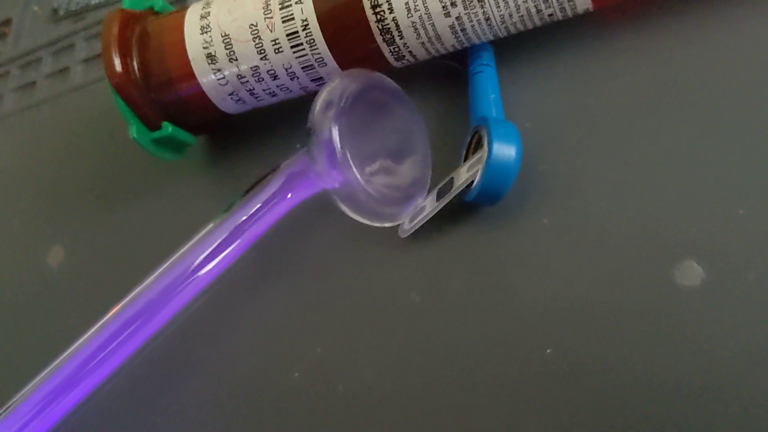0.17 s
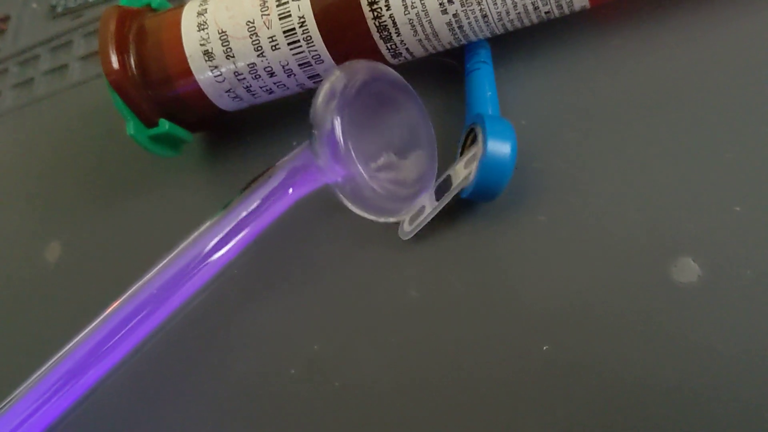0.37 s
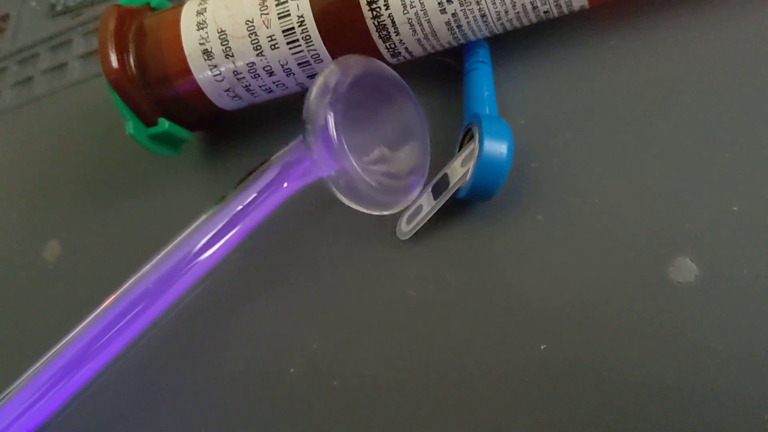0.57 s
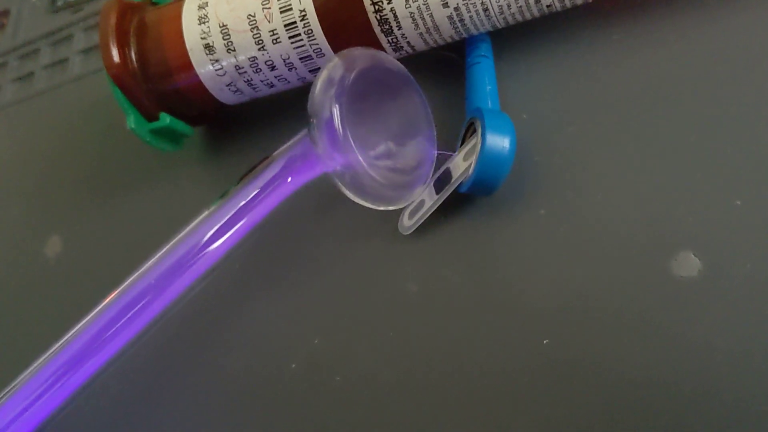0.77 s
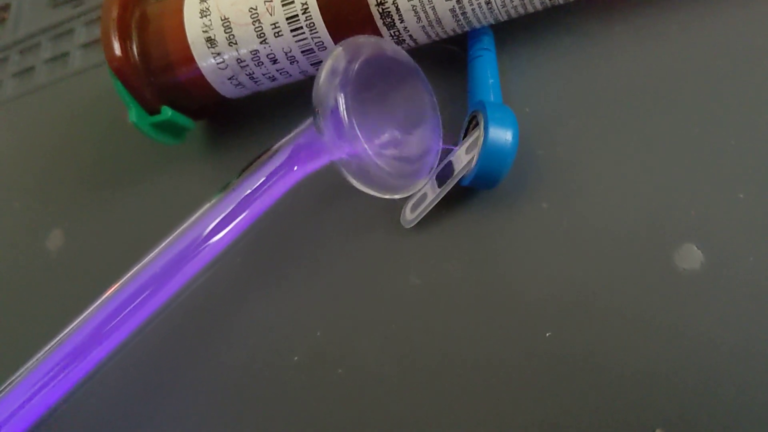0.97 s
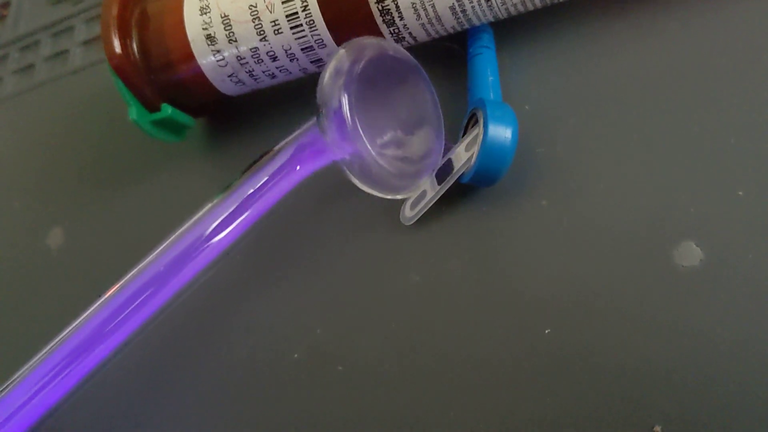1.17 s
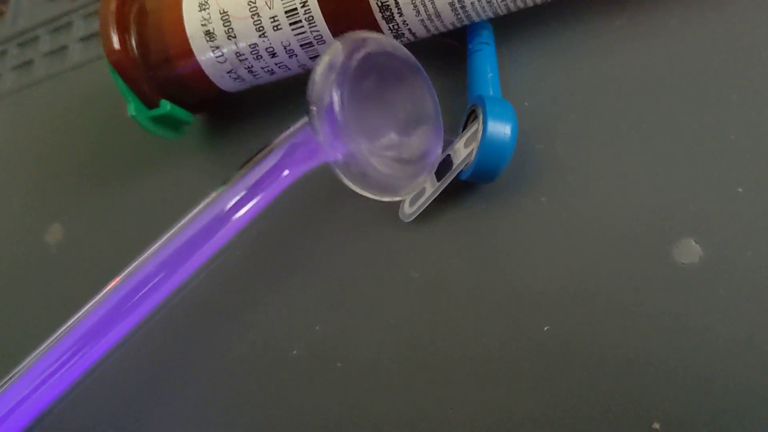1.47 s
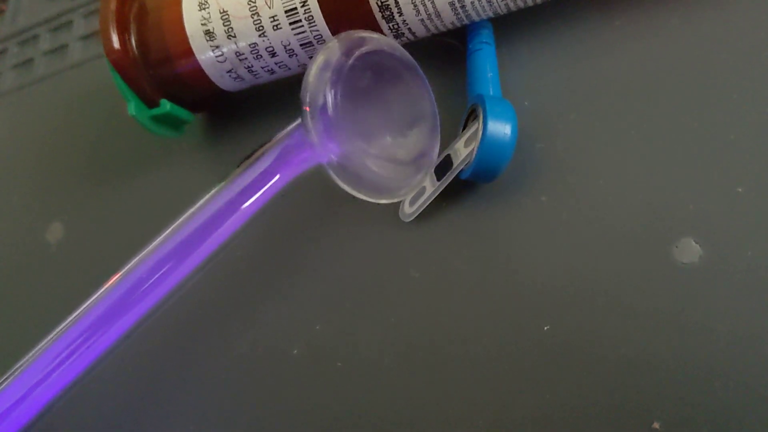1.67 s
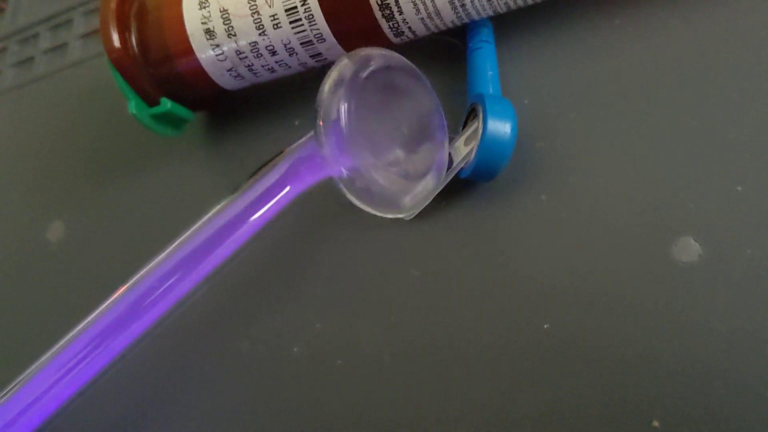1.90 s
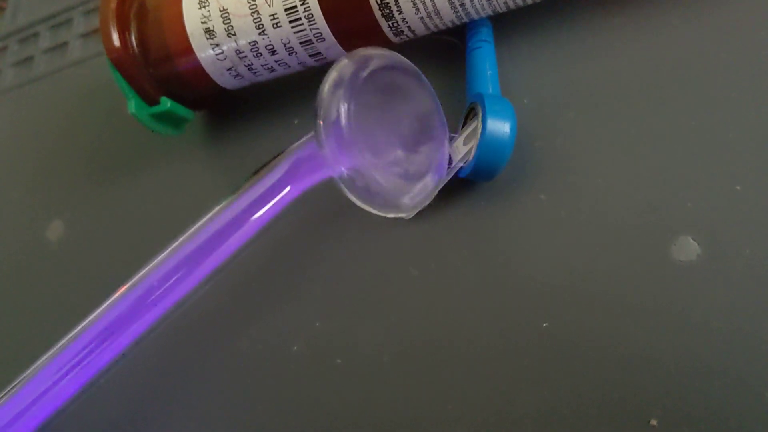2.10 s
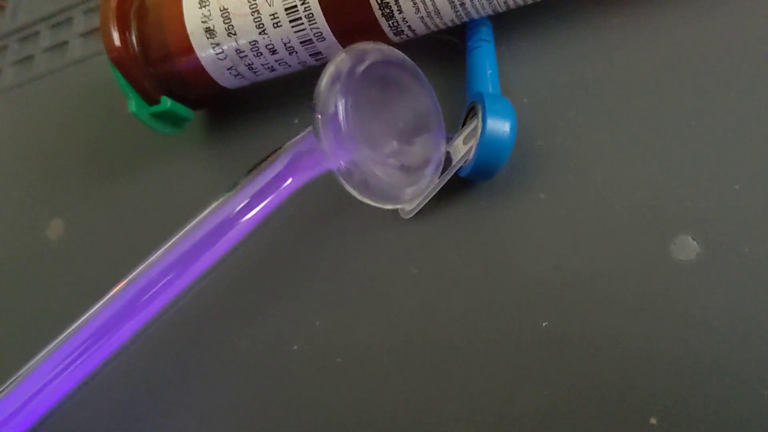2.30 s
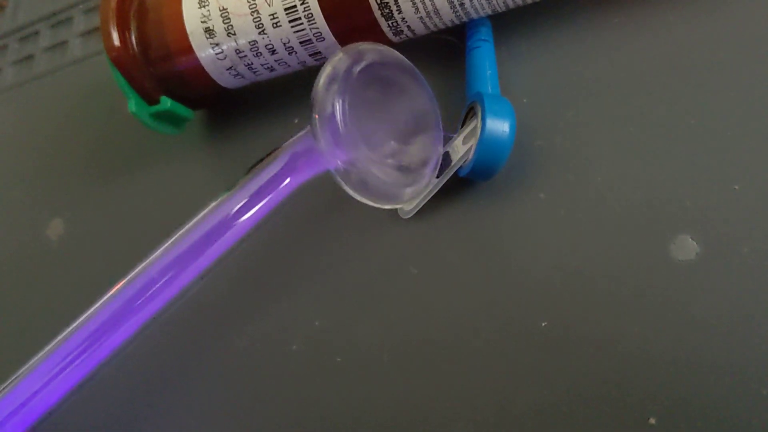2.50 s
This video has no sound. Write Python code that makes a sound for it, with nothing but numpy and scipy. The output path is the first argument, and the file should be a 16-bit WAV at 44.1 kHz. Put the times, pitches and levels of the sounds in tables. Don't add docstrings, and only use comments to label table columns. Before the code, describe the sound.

Electrical discharge buzzes thinly and rapidly, very close to a handheld stereo microphone; soft handling rumble comes first, then snapping sparks with low thumps on the right, a buzzing lull, and a second denser crackle.

```python
import sys
import numpy as np
from scipy import signal
from scipy.fft import rfft, irfft, next_fast_len
from scipy.io import wavfile
from scipy.ndimage import map_coordinates

SR = 44100
rng = np.random.default_rng(int(sys.argv[2]) if len(sys.argv) > 2 else 0)


def elevation(decibels):
    levels = np.asarray(decibels, float)
    return 10 ** (levels / 20)


def wav_out(sig):
    wavfile.write(sys.argv[1], SR, np.round(np.clip(np.atleast_2d(sig).T, -1, 1) * 32767).astype(np.int16))


N = 116865

STRIKE_HZ, FIRST_STRIKE_S = 120.012, .00145
JITTER_S, SCATTER_DB = .000002, 1.2
LEFT_LAG_S = 0.00017

# start_s, rumble_db, rustle_above_rumble_db
HANDLING = [(0, -66, 1), (.09, -59, 4), (.2, -56, -2.5), (.39, -65, 3.5), (.43, -46.5, -11.5),
            (.52, -51.5, -6.5), (.56, -59, -2), (.9, -64, 2.5), (1.1, -74.5, 8.5), (1.17, -78, 2),
            (1.66, -82, 15), (1.71, -67.5, 7.5), (1.8, -65, -2), (1.95, -76, 3), (2.3, -94, 0),
            (2.65, -79, -12)]
# frequency_hz, density_db
RUMBLE_SPECTRUM = [(15, -43), (25, -41), (45, 0), (75, -3.5), (282, -14.5), (669, -20), (734, -13.5),
                   (1000, -31), (1300, -26), (2200, -120)]
# start_s, level_db
HUM_LEVEL = [
    (.52, -63),
    (.6, -57),
    (.85, -59),
    (.95, -83),
]
# frequency_hz, density_db
HISS_SPECTRUM = [(25, -17), (60, -15), (300, -7), (1000, -2.5), (2200, -3.5), (3200, 4.5), (4500, 3.5),
                 (10000, 3), (16000, -25)]
# start_s, level_db, polarity
JOLTS = [(.885, -36.5, 1), (.918, -40.5, 1), (.935, -11.5, 1), (1.018, -26.5, 1), (1.043, -12.5, 1),
         (1.052, -21, -1), (1.851, -17.5, 1), (1.860, -20.5, 1), (2.001, -27, 1), (2.060, -25, -1),
         (2.068, -22, 1), (2.176, -21.5, -1), (2.376, -30.5, -1), (2.484, -26, -1), (2.510, -49, 1)]
# frequency_hz, level_db
THUMP_SPECTRUM = [(35, -26), (65, 2.5), (130, -2), (220, 0), (600, -6), (1400, -6.5), (1500, -13),
                  (3500, -9.5), (6000, -52)]
# frequency_hz, t60_s
TABLE_DECAY = [(1000, 0.01), (6000, 0.039), (16000, 0.0059)]
TABLE_LEVEL = [
    [-6],
    [-15],
]
# frequency_hz, t60_s
ROOM_DECAY = [(1000, 0.041), (6000, 0.23), (16000, 0.11)]
ROOM_LEVEL = [
    [-10],
    [-18],
]
# pitch_hz, width_hz, level_db
TUBE_LEFT = [(1450, 160, -17), (3080, 370, -8), (4330, 72, -4), (5200, 300, -46), (2333, 154, -15)]
TUBE_RIGHT = [(1408, 165, -9.5), (3400, 380, -5), (4445, 145, 11.5), (5200, 300, -37), (2332, 50, -5.5)]
# pitch_hz, width_hz, level_db
GLOW_LEFT = [(8250, 1700, -46), (14200, 1600, -6.5), (15200, 600, -46)]
GLOW_RIGHT = [(9840, 380, 11.6), (11230, 550, 5.4), (15200, 1340, 3.5)]
# pitch_hz, width_hz, level_db
STREAMER_LEFT = [(2370, 117, -21), (3800, 2900, -21), (4970, 690, -17.5), (6580, 1850, -12.5),
                 (10260, 170, -5), (10960, 230, -22), (14050, 1100, 0), (14750, 510, -0.5)]
STREAMER_RIGHT = [(2375, 510, -16.5), (4280, 870, -13.5), (5666, 256, -11.5), (6760, 420, -11.5),
                  (9070, 500, -7), (11120, 560, -4), (14770, 1360, -0.5)]
# pitch_hz, width_hz, level_db
SPARK_LEFT = [(2380, 1960, -26), (5674, 330, -12), (6460, 690, -10.5), (10100, 3500, -15.5),
              (11660, 110, -19.5), (13860, 1600, -4.5), (15030, 1600, -1.5)]
SPARK_RIGHT = [(2680, 2000, -20.5), (5040, 910, -10.5), (7360, 1300, -6.5), (9180, 2700, -10),
               (13264, 730, 0), (15200, 4350, -1)]
# start_s, streamer_level_db, streamer_left_minus_right_db, glow_level_db
WAND_COURSE = [(0, -31, -16, -44), (.12, -29.5, -10, -46), (.5, -25.5, -12.5, -37.5),
               (.87, -27.5, -11.5, -33), (.89, -21, -10.5, -63), (1.13, -34, 0, -40), (1.2, -29, -7, -33),
               (1.4, -21.5, -11, -50), (1.6, -24, -14, -69), (1.61, -36.5, -8.5, -33.5),
               (1.82, -38.5, -12, -31.5), (1.83, -26.5, -14, -39), (2.01, -23, -12, -35),
               (2.04, -31, -2, -33), (2.22, -35.5, 1.5, -47), (2.4, -24, -12.5, -31.5),
               (2.49, -24, -11, -33), (2.51, -34.5, -1.5, -36)]
# start_s, change_db
UNEVEN_STRIKES = [(0.068, -2.8), (0.101, -6), (0.11, 5), (0.118, 5), (0.301, -5), (0.385, 4.5),
                  (0.501, 6.5), (0.526, -2), (0.56, 5), (0.76, -1.5), (0.81, 2.5), (0.826, 4.5), (0.86, -1),
                  (0.876, -5), (1.276, -5), (1.285, 3.5), (1.351, -7), (1.368, -6), (1.385, -4),
                  (1.393, 0.5), (1.418, -4), (1.426, 0.5), (1.468, 2.5), (1.476, -5), (1.501, -3),
                  (1.51, -4), (1.518, 2), (1.576, -11), (1.585, -1), (1.601, -0.5), (1.818, -1),
                  (1.843, -3.9), (1.851, 7.5), (1.885, 2.5), (1.893, 4.5), (1.91, 4.5), (1.951, 2.5),
                  (2.001, -1), (2.018, -5), (2.226, -2), (2.293, -4), (2.351, -2.7), (2.501, -2),
                  (2.576, 0), (2.626, 4.5)]
# start_s, left_level_db, right_level_db
FIRST_SPARKS = [(0.885, -16.4, -14.5), (0.893, -21.9, -20.9), (0.901, -19.5, -16.3), (0.91, -18.6, -17.6),
                (0.918, -15.6, -14.2), (0.926, -29.3, -29.6), (0.935, -14.3, -15.0), (0.943, -17.2, -18.9),
                (0.96, -29.4, -25.0), (0.976, -21.5, -24.7), (0.985, -20.9, -23.1), (0.993, -28.5, -29.6),
                (1.043, -12.9, -16.9), (1.051, -16.4, -20.2), (1.06, -26.0, -31.1), (1.068, -21.0, -24.8),
                (1.076, -15.6, -20.1), (1.093, -19.7, -25.4), (1.101, -27.2, -31.8), (1.176, -17.0, -15.6),
                (1.226, -26.7, -21.6), (1.26, -17.0, -13.5), (1.268, -29.4, -22.5)]
SECOND_SPARKS = [(1.785, -27.9, -16.3), (2.026, -18.7, -15.3), (2.035, -12.3, -10.3), (2.043, -16.0, -14.3),
                 (2.06, -12.7, -10.8), (2.068, -16.0, -13.7), (2.101, -17.7, -15.6), (2.11, -15.2, -12.5),
                 (2.118, -17.4, -15.0), (2.126, -25.5, -22.1), (2.135, -16.7, -14.3), (2.151, -18.8, -16.5),
                 (2.16, -20.9, -17.9), (2.168, -16.3, -18.3), (2.176, -11.6, -10.6), (2.185, -17.8, -20.9),
                 (2.21, -20.9, -22.2), (2.276, -26.6, -24.2), (2.51, -15.9, -11.7), (2.518, -17.3, -13.6)]
BAND_LIMIT = [
    [17070],
    [16080],
]


def unit(x):
    return x / np.sqrt(np.mean(x ** 2, axis=-1, keepdims=True) + 1e-20)


def along(points, hz):
    f, value = np.transpose(points)
    return np.interp(np.log(hz + 1), np.log(f + 1), value)


def curve(rows, s):
    t, *columns = np.transpose(rows)
    return [np.interp(s, t, column) for column in columns]


def filtered(x, response):
    m = next_fast_len(N + SR // 2)
    return irfft(rfft(x, m) * response(np.fft.rfftfreq(m, 1 / SR)), m)[..., :N]


def resonances(f, peaks):
    total = 0
    for k, (center, width, db) in enumerate(peaks):
        damping = 1j * f * width
        total = total + (-1) ** k * elevation(db) * damping / (center * center - f * f + damping)
    return total


def voiced(x, left, right):
    def response(f):
        delay = np.exp(-2j * np.pi * f * LEFT_LAG_S)
        both = np.array([resonances(f, left) * delay, resonances(f, right)])
        return both / np.sqrt(np.mean(abs(both) ** 2, axis=1).max())
    return filtered(x, response)


def snapped(s):
    return FIRST_STRIKE_S + np.round((np.asarray(s) - FIRST_STRIKE_S) * STRIKE_HZ) / STRIKE_HZ


def strike_times():
    return FIRST_STRIKE_S + np.arange(int(N / SR * STRIKE_HZ) + 1) / STRIKE_HZ


def uneven_db(count):
    t, db = np.transpose(UNEVEN_STRIKES)
    index = np.round((t - FIRST_STRIKE_S) * STRIKE_HZ).astype(int)
    return np.bincount(index, db, count)


def discharges(s, level_db, pan_db, scatter_db, jitter_s, spread_s, branch_db, count):
    luck = rng.standard_normal((len(s), 2 * count + 2))
    lead_s = s + jitter_s * luck[:, 0]
    lead_db = level_db + scatter_db * luck[:, 1]
    branch_s = lead_s[:, None] + spread_s * abs(luck[:, 2:count + 2])
    when = SR * np.c_[lead_s, branch_s]
    size = elevation(lead_db)[:, None] * np.c_[np.ones(len(s)), elevation(branch_db) * luck[:, count + 2:]]
    at = np.floor(when).astype(int)[..., None] + np.arange(-7, 9)
    off = at - when[..., None]
    click = size[..., None] * np.sinc(off) * np.cos(np.pi * off / 16) ** 2

    def side(db):
        weighted = click * elevation(db)[:, None, None]
        return np.bincount(np.clip(at, 0, N).ravel(), weighted.ravel(), N + 1)[:N]
    return np.array([side(np.minimum(pan_db, 0)), side(np.minimum(-pan_db, 0))])


def noise(spectrum, count):
    white = rng.standard_normal((count, N))
    return unit(filtered(white, lambda f: elevation(along(spectrum, f))))


def recorder_floor():
    t = np.arange(N) / SR
    lumps_db = 1.5 * map_coordinates(rng.standard_normal(40), [t * 14])
    rumble_db, rustle_db = curve(HANDLING, t)
    pair = noise(RUMBLE_SPECTRUM, count=2)
    low = filtered(pair, lambda f: 1 / (1 + (f / 190) ** 4))
    common, difference = (low + elevation(rustle_db) * (pair - low)) * elevation(rumble_db + lumps_db)
    hum = elevation(curve(HUM_LEVEL, t)[0]) * np.sin(2 * np.pi * 103 * t)
    hiss = elevation(-57.5) * noise(HISS_SPECTRUM, count=2)
    return common + hum + np.array([0.24 * difference, -.15 * difference]) + hiss


def wiring_thumps():
    turns, bend, from_hz = 2.4, .4, 470
    cross_hz, cross_width_hz = 140, 45
    jolts = np.zeros(N)
    t, db, sign = np.transpose(JOLTS)
    jolts[np.round(snapped(t) * SR).astype(int)] = np.sign(sign) * elevation(db + 32)

    def response(f):
        phase_turns = turns * np.maximum((100 / (f + 1)) ** bend - (100 / from_hz) ** bend, 0)
        cross = cross_hz ** 2 - f * f + 1j * f * cross_width_hz
        allpass = np.conj(cross) / cross
        return elevation(along(THUMP_SPECTRUM, f)) * np.exp(2j * np.pi * phase_turns) * allpass
    return filtered(jolts, response) * elevation([[-74], [0]])


def reflections(x, decay, level_db, count):
    hz, t, z = signal.stft(rng.standard_normal((count, 2, SR // 8)), SR, nperseg=64)
    tails = signal.istft(z * elevation(-60 * t / along(decay, hz)[:, None]), SR, nperseg=64)[1]
    tails = tails / np.linalg.norm(tails, axis=-1, keepdims=True)
    tails = np.pad(tails, ((0, 0), (0, 0), (30, 0)))
    strike = ((np.arange(N) / SR - FIRST_STRIKE_S) * STRIKE_HZ + 1.1).astype(int)
    spot = rng.integers(count, size=strike[-1] + 1)[strike]
    wet = 0
    for k, tail in enumerate(tails):
        wet = wet + signal.fftconvolve(x * (spot == k), tail, axes=1)[:, :N]
    return elevation(level_db) * wet


def glass_tube():
    s = strike_times()
    clicks = discharges(s, -22 + 0 * s, 0 * s, scatter_db=SCATTER_DB, jitter_s=JITTER_S,
                        spread_s=0.00045, branch_db=-20, count=2)
    return voiced(clicks, TUBE_LEFT, TUBE_RIGHT)


def glow():
    s = strike_times()
    glow_db = curve(WAND_COURSE, s)[2]
    clicks = discharges(s, glow_db + uneven_db(len(s)) + 19, 0 * s, scatter_db=SCATTER_DB,
                        jitter_s=JITTER_S, spread_s=0.000308, branch_db=-20, count=4)
    return voiced(clicks, GLOW_LEFT, GLOW_RIGHT)


def streamers():
    s = strike_times()
    streamer_db, pan_db, _ = curve(WAND_COURSE, s)
    clicks = discharges(s, streamer_db + uneven_db(len(s)) + 20.5, pan_db, scatter_db=SCATTER_DB,
                        jitter_s=JITTER_S, spread_s=0.000396, branch_db=-17.5, count=5)
    return voiced(clicks, STREAMER_LEFT, STREAMER_RIGHT)


def sparks():
    t, left_db, right_db = np.transpose(list(FIRST_SPARKS) + list(SECOND_SPARKS))
    left_db = left_db + 3
    clicks = discharges(snapped(t), np.maximum(left_db, right_db) + 16, left_db - right_db, scatter_db=0,
                        jitter_s=.00003, spread_s=0.000235, branch_db=-15, count=5)
    return voiced(clicks, SPARK_LEFT, SPARK_RIGHT)


def scene():
    air = (glow() + streamers() + sparks()) * elevation([[2.5], [0]])
    table = reflections(air, TABLE_DECAY, TABLE_LEVEL, count=2)
    room = reflections(air, ROOM_DECAY, ROOM_LEVEL, count=2)
    return recorder_floor() + wiring_thumps() + table + room + glass_tube() + air


def band_limit(x):
    return signal.sosfilt(signal.butter(12, 16970, fs=SR, output="sos"), x)


def record(dry):
    def response(f):
        steepness = (f - np.array(BAND_LIMIT)) / 810 * 3
        return 1 / (1 + np.exp(np.clip(steepness, -40, 40)))
    mix = filtered(dry, response)
    return band_limit(mix)


dry = scene()
out = record(dry)
wav_out(out)
```